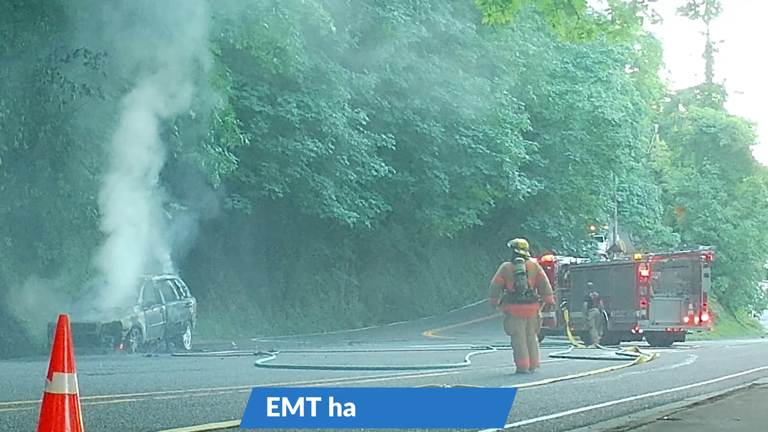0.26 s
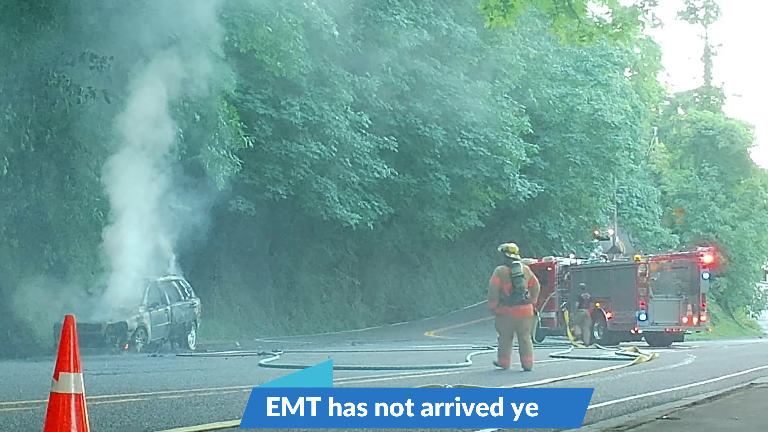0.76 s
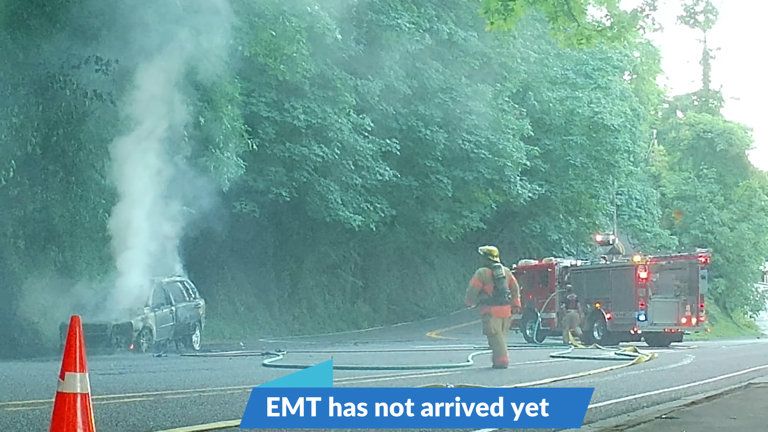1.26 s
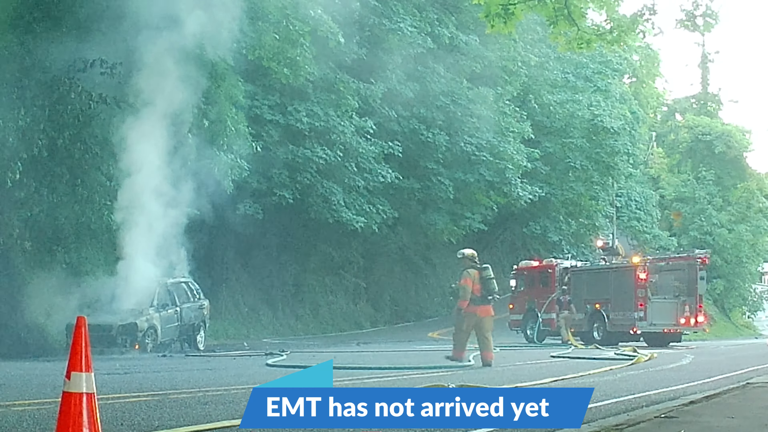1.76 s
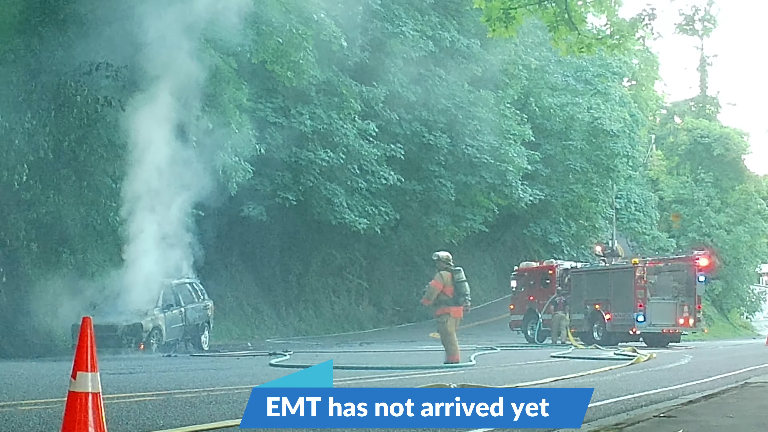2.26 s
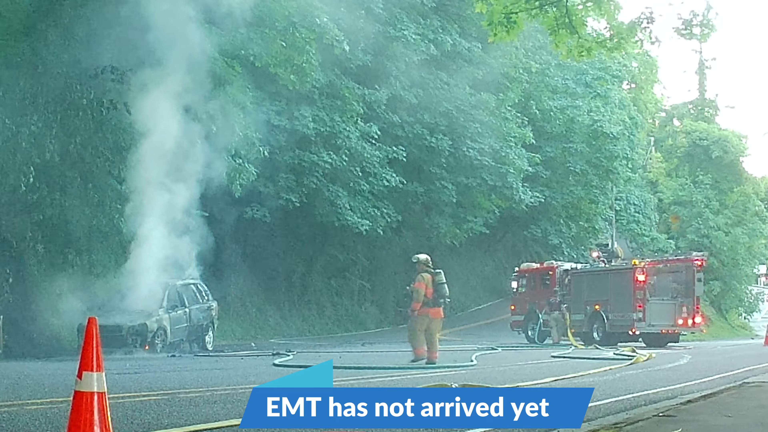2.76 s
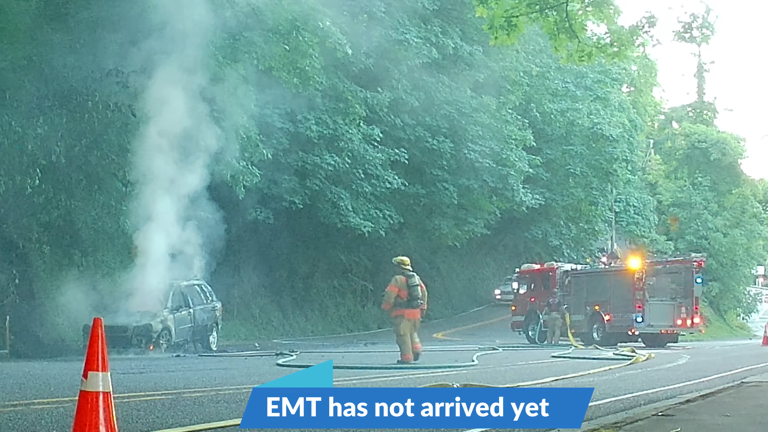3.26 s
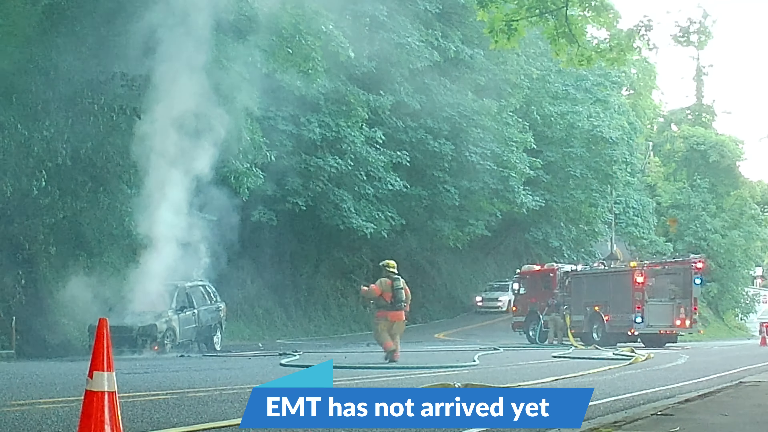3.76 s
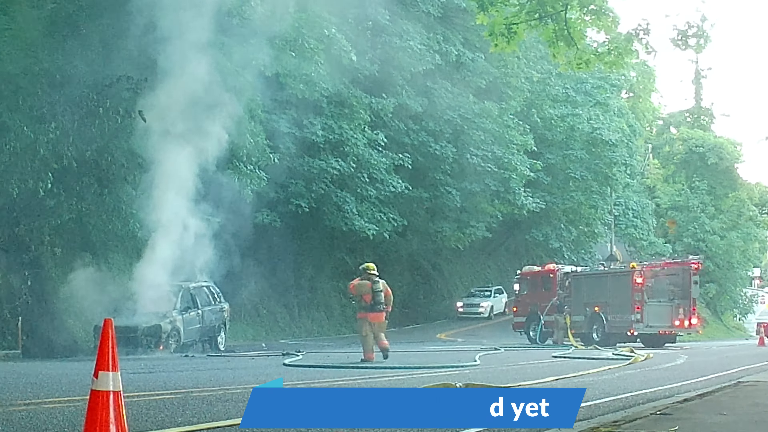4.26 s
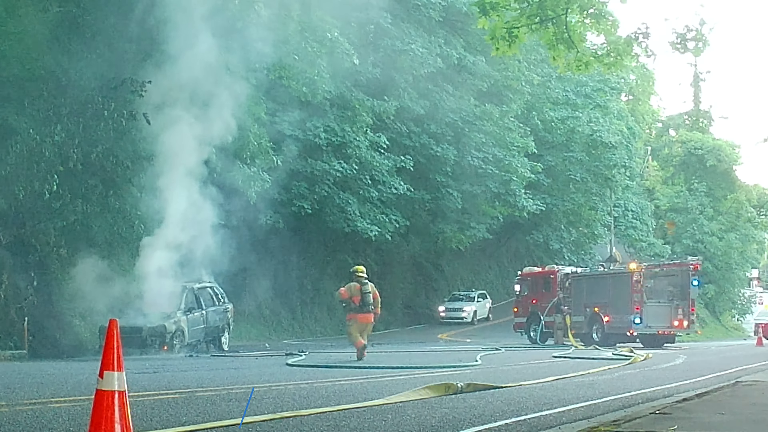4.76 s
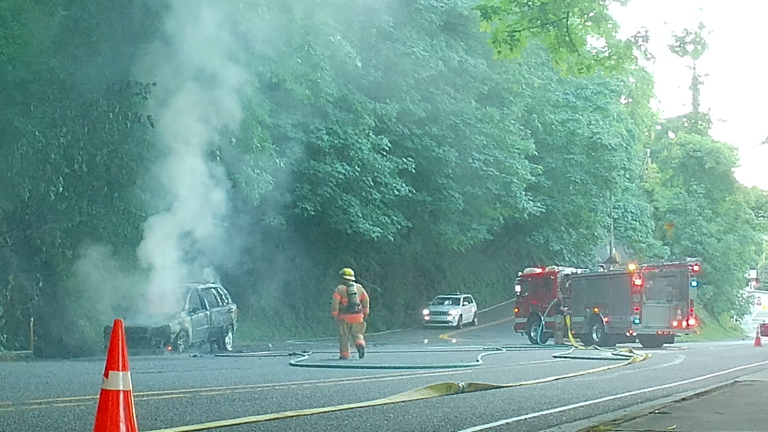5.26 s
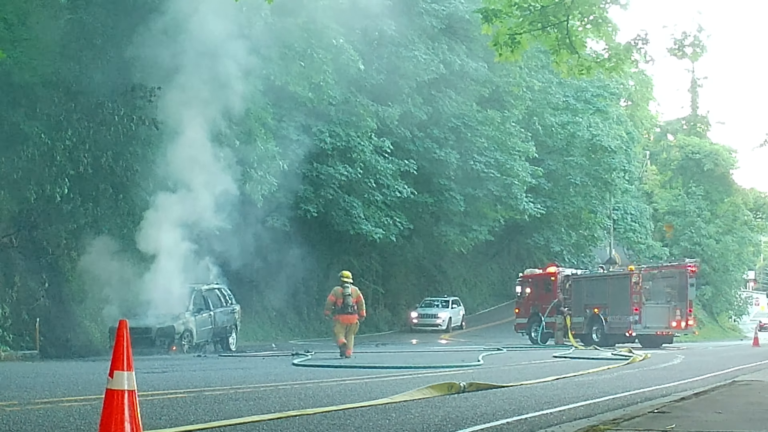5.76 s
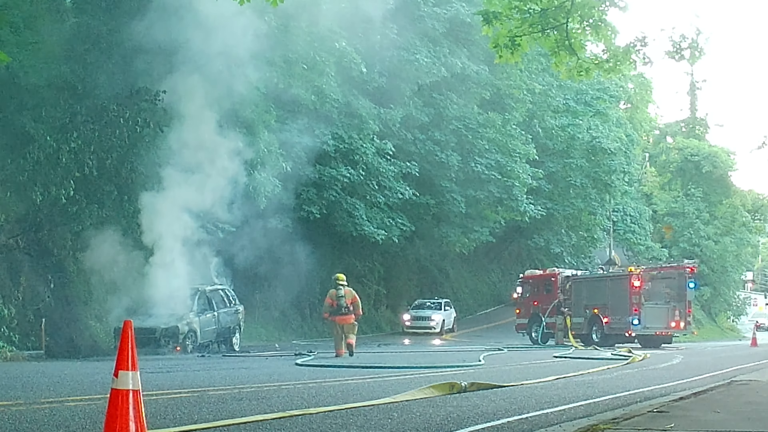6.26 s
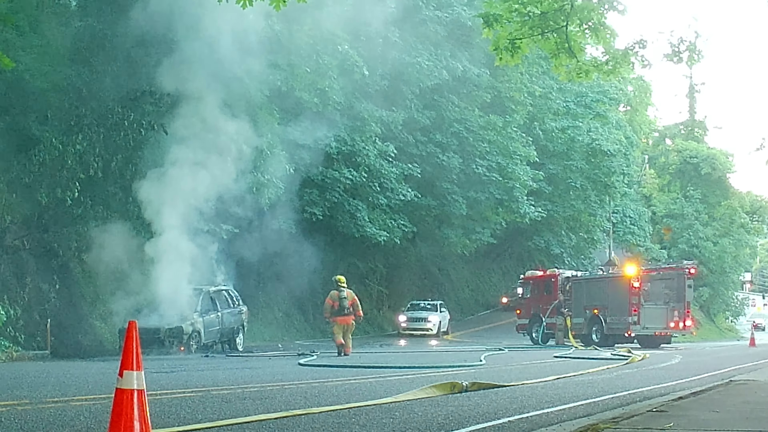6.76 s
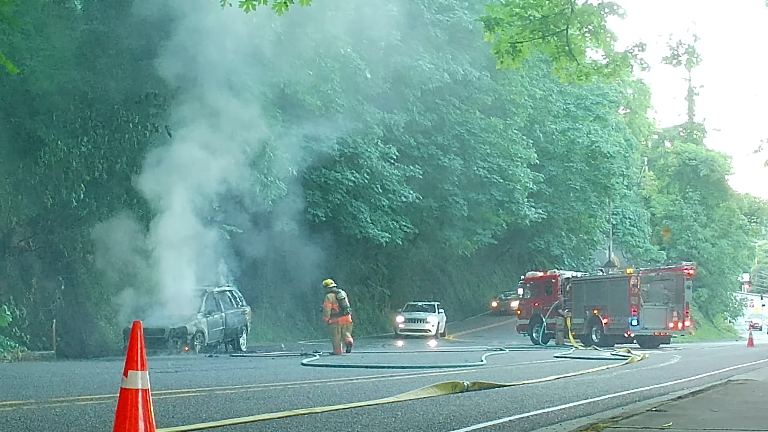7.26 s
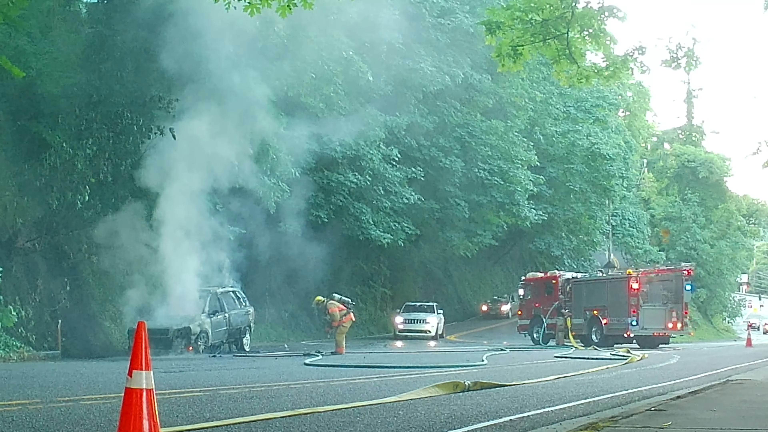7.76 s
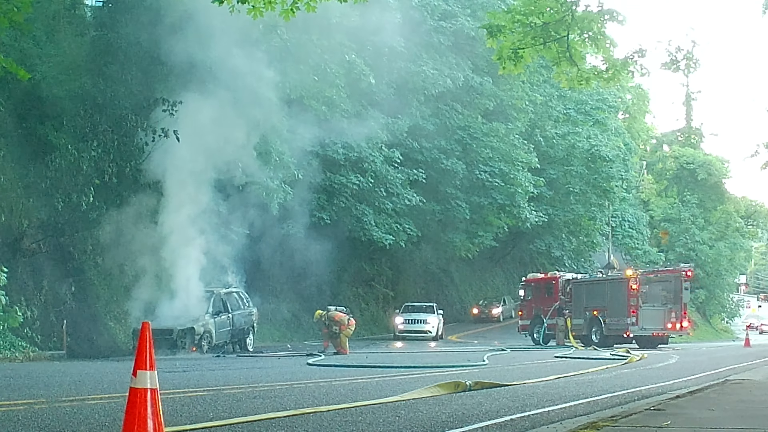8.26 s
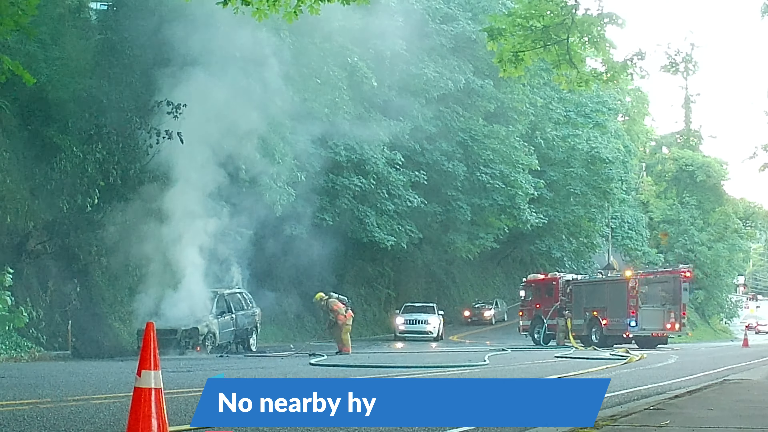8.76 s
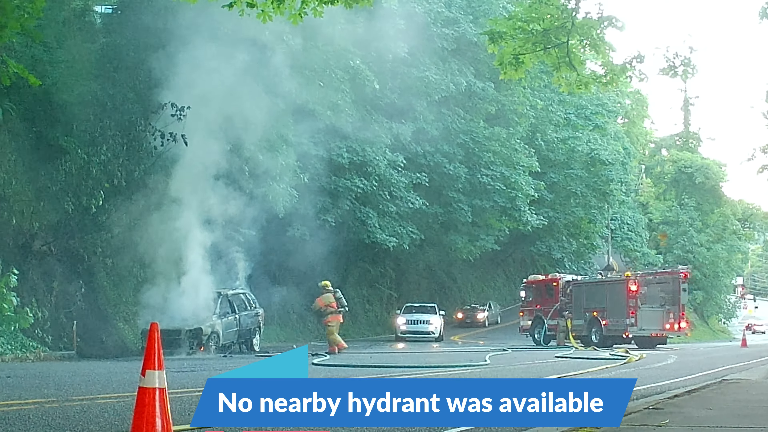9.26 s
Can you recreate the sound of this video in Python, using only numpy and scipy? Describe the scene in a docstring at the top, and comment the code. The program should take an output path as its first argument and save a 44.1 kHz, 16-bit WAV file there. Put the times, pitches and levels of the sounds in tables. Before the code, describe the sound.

Outdoors on a damp roadside, a fire engine's diesel holds a fast idle, a deep steady drone with soft muffled knocking and faint pump whine. A heavy vehicle's exhaust surges early, sinks in pitch as it slows, and fades around six seconds. Traffic rumble and wet hiss continue while queueing cars growl closer. Mono microphone at some distance, bass-heavy with faint hiss.

```python
"""Fire engine pumping on a wet road

A six-cylinder diesel at a fast idle gives steady tones locked to its crankshaft, and knocks that ring its block.
A heavy vehicle slows down nearby: three multiples of a sinking firing rate, coloured by its exhaust pipe.
Traffic rumbles, roars and hisses as coloured noise, and a queue of cars growls louder as it comes closer.
A howl wanders in pitch as one sine, and short drones and squeals swell and go as gliding tones."""
import sys
import numpy as np
from scipy import signal
from scipy.fft import irfft, next_fast_len
from scipy.io import wavfile
from scipy.ndimage import uniform_filter1d

SR = 44100
rng = np.random.default_rng(int(sys.argv[2]) if len(sys.argv) > 2 else 0)


def inscribe(sig):
    """Save sig as 16-bit PCM at rate SR to the path in sys.argv[1].

    A 1-D sig is mono; a 2-D sig holds one channel per row.
    Samples are clipped to [-1, 1] before scaling.
    """
    pcm = np.round(np.clip(np.atleast_2d(sig).T, -1, 1) * 32767)
    wavfile.write(sys.argv[1], SR, pcm.astype(np.int16))


def voltage_ratio(level):
    """Linear amplitude factor for a level in decibels (scalar or array-like)."""
    return 10 ** (np.asarray(level, float) / 20)


N = 419832
TIME = np.arange(N) / SR  # seconds

# Diesel four-stroke cycle (two crank turns), hunting slightly under the governor: (time [s], rate [cycles/s])
CYCLE_RATE = [(0, 10.51), (1.5, 10.492), (3.75, 10.533), (5.25, 10.518), (6.75, 10.534), (8.25, 10.543),
              (9.52, 10.6)]
# Steady diesel tones; 6 is the firing rate, the high ones are gear teeth and pump vanes:
# (multiple of the cycle rate [1], level [dB rms])
DIESEL_TONES = [(6, -26.5), (12, -33.5), (16, -43.5), (18, -38), (21, -46.5), (30, -46.5), (32, -44),
                (36, -47), (50, -53), (54, -53), (80, -52), (84, -59), (88, -60), (90, -53), (96, -54),
                (99, -57), (101, -59), (104, -57), (106, -57.5), (108, -57), (114, -60), (118, -53),
                (152, -56.5), (155, -67), (171, -68.5), (192, -71), (223, -73)]
# Resonances of engine block and casings: (frequency [Hz], width [Hz], level [dB rms])
BLOCK_RESONANCES = [(1060, 380, -52), (1760, 350, -71)]

# Firing rate of the slowing vehicle: (time [s], frequency [Hz])
SLOWING_FIRING = [(0, 47.8), (.85, 47.1), (2.6, 46.4), (3.4, 43.3), (4.4, 40), (4.98, 36.4), (5.25, 35.9),
                  (5.55, 34.8), (6.0, 35.7)]
# Its exhaust pipe favours some pitches, most near 73 and 130 Hz.
# Level of a multiple that falls there, before the load acts: (frequency [Hz], level [dB rms])
EXHAUST_PIPE = [(34.8, -23), (36, -32), (41, -31), (45, -24.5), (47, -22), (70, -33), (71.8, -27),
                (72.8, -17.5), (75, -29), (81, -25), (87, -31), (94, -28), (110, -48), (120, -28),
                (130, -17), (135, -22.5), (139, -29.5), (142, -33)]
# Its engine load, which jumps once and ends as it pulls up: (time [s], gain [dB])
ENGINE_LOAD = [(0, -9), (.6, -5), (.85, 5), (1.2, 3), (2.1, 1), (2.6, 0), (6.0, 0), (6.5, -40)]
# How far the 1st, 2nd and 3rd multiple follow the load: one share each [dB per dB]
LOAD_SHARES = [1, .4, .4]

# Swell of the passing traffic about its usual level: (time [s], gain [dB])
TRAFFIC_SWELL = [(0, -4), (.5, -3), (1.2, -0.5), (1.6, 1.5), (2.5, -2.5), (3.2, -0.2), (4.1, .5),
                 (5.1, -0.3), (7.2, 0.76), (8.2, 1.6), (9.52, -.3)]
# Level of the ground rumble: (time [s], level [dB rms])
RUMBLE_LOUDNESS = [(0, -22.5), (.8, -21), (3.4, -21.5), (4.2, -21), (5.8, -23.5), (7.1, -21), (7.7, -22.5),
                   (9.52, -19)]
# Level of the wet hiss: (time [s], level [dB rms])
HISS_LOUDNESS = [(0, -54), (1.8, -52.5), (2.4, -53.3), (4.4, -52.5), (6.9, -53), (8.3, -51), (9.52, -50.5)]
# Colours of the noises, only the shape counts: (frequency [Hz], relative level per Hz [dB])
RUMBLE_COLOUR = [(5, -20), (14, -2.5), (22, -1.5), (32, 3), (44, -1), (56, 0), (75, -1.5), (100, 0.5),
                 (125, -6.5), (150, -5.5), (220, -18), (290, -26)]
ROAR_COLOUR = [(100, -27.5), (170, -2), (275, -4.5), (338, -5.5), (427, -10), (492, -7.5), (609, -13.5),
               (800, -20), (1040, -31), (1760, -120)]
GROWL_COLOUR = [(150, -18), (200, -3), (250, 4.5), (300, -9.5), (350, -18)]
MOAN_COLOUR = [(440, -17), (478, -6.5), (495, -4.5), (525, -7.5), (570, -19.5)]
RUSH_COLOUR = [(380, -28), (650, -1.5), (1100, -5), (1490, -12), (1620, -12.5), (2190, -20), (3000, -27.5),
               (3900, -42), (6600, -120)]
HISS_COLOUR = [(1530, -16.5), (2600, -4), (3400, -6), (4520, -12), (5500, -13), (6600, -14.5), (8000, -19),
               (9200, -24), (10300, -21), (11500, -28.5), (13500, -43)]
MICROPHONE_COLOUR = [(5000, -9), (9000, 1.5), (12000, -2.5), (15500, -3.5), (16100, -7)]

# Pitch of the wandering howl, before its corners are smoothed: (time [s], frequency [Hz])
HOWL_PITCH = [(.4, 336), (.95, 388), (1.9, 428), (2.28, 338), (2.45, 325), (2.72, 322), (3.05, 372),
              (3.5, 371), (3.8, 381), (4.25, 382), (4.6, 334), (4.8, 349), (5.02, 349), (5.25, 326),
              (5.55, 352), (5.8, 326), (6.1, 341), (7.7, 357), (8.3, 360), (8.8, 310)]
# Level of the howl; it drops out once and flares before the end: (time [s], level [dB rms])
HOWL_LOUDNESS = [(.4, -55), (.52, -36), (1.03, -35), (1.2, -52), (1.9, -52), (2.02, -36), (4.4, -31),
                 (6.0, -33.5), (8.25, -32.5), (8.5, -27), (8.68, -33), (8.8, -55)]
# Drones and squeals that swell and go, with the level at the middle of each:
# (middle [s], length [s], start frequency [Hz], end frequency [Hz], level [dB rms])
DRONES_AND_SQUEALS = [(1.55, .9, 495, 486, -36), (2.05, 1.1, 8500, 7900, -73), (4.5, .8, 20.5, 19.5, -25),
                      (5.25, .5, 129, 126, -30), (5.4, .9, 8150, 8400, -75.5), (6.5, .5, 87, 84, -30),
                      (6.95, .5, 115, 118, -25), (7.25, .4, 128, 126, -22), (7.5, .4, 103, 99, -30),
                      (8.05, .5, 249, 251, -33), (8.3, .7, 96, 105, -20), (8.95, .8, 74, 73, -24),
                      (9.02, .22, 12040, 12060, -77), (9.45, .5, 127, 128, -23)]


def rms_one(x):
    """Scale to rms 1."""
    return x / np.sqrt(np.mean(x ** 2))


def in_time(rows):
    """Join the points of a (time, value) table by straight lines."""
    times, values = np.transpose(rows)
    return np.interp(TIME, times, values)


def drift(rate_hz, spread_db, size=N):
    """A slowly wandering gain: white noise twice through a one-pole low-pass, read as dB."""
    # one slow value per 100 samples; the first 2000 let the filter settle
    pole = np.exp(-200 * np.pi * rate_hz / SR)
    white = rng.standard_normal(N // 100 + 2002)
    slow = signal.lfilter([1], [1, -2 * pole, pole * pole], white)[2000:]
    gain = voltage_ratio(spread_db * rms_one(slow))
    return np.interp(np.arange(size) / 100, np.arange(len(slow)), gain)


def tone(hz, waver_db, waver_hz):
    """A sine of rms about 1 whose strength wavers on its way through moving air."""
    angle = np.cumsum(hz * (2 * np.pi / SR)) + 2 * np.pi * rng.random()
    return np.sqrt(2) * drift(waver_hz, waver_db, size=len(hz)) * np.sin(angle)


def noise(colour, level_db, patchy_db):
    """Random noise shaped to a colour, at a given level, whose strength wanders by patchy_db."""
    hz, db = np.transpose(colour)
    size = next_fast_len(N)
    bins_hz = np.fft.rfftfreq(size, 1 / SR) + 1e-3  # the offset avoids log(0)
    # straight lines over log frequency, practically silent outside the table
    shape = voltage_ratio(np.interp(np.log(bins_hz), np.log(hz), db, left=-200, right=-200))
    chance = rng.standard_normal(2 * len(shape)).view(complex)
    coloured = rms_one(irfft(shape * chance, size)[:N])
    return voltage_ratio(level_db) * drift(8.0, patchy_db) * coloured


def diesel():
    """Tones locked to one crankshaft; valves and injectors knock on the block in a pattern kept every cycle."""
    cycle_hz = in_time(CYCLE_RATE)
    out = np.zeros(N)
    for multiple, db in DIESEL_TONES:
        out += voltage_ratio(db) * tone(multiple * cycle_hz, waver_db=1.2, waver_hz=1.2)

    cycles_done = np.cumsum(cycle_hz) / SR
    knocks = np.zeros(N)
    for place, strength in rng.random((24, 2)):  # 24 knocks, each at its own place in the cycle
        at = np.searchsorted(cycles_done, np.arange(place, cycles_done[-1]))
        knocks[at] += (strength - .5) * voltage_ratio(rng.normal(0, 1.4, len(at)))
    low_pass = signal.butter(4, 2200, fs=SR, output="sos")
    soft_knocks = signal.sosfilt(low_pass, knocks + 1e-18)
    for hz, width_hz, db in BLOCK_RESONANCES:
        b, a = signal.iirpeak(hz, hz / width_hz, SR)
        out += voltage_ratio(db) * rms_one(signal.lfilter(b, a, soft_knocks))
    return out


def slowing_vehicle():
    """Three multiples of a firing rate that sinks as the vehicle brakes, each coloured by the pipe at its pitch."""
    firing_hz, load_db = in_time(SLOWING_FIRING), in_time(ENGINE_LOAD)
    pipe_hz, pipe_db = np.transpose(EXHAUST_PIPE)
    out = np.zeros(N)
    for multiple, share in enumerate(LOAD_SHARES, start=1):
        hz = multiple * firing_hz
        level_db = share * load_db + np.interp(hz, pipe_hz, pipe_db)
        out += voltage_ratio(level_db) * tone(hz, waver_db=.8, waver_hz=3.0)
    return out


def queue_growl():
    """Cars creep up to the closed lane and stop; their growl grows as one over the distance."""
    start_m, rest_m, stops_s = 92, 13.7, 6.94
    distance_m = np.interp(TIME, [0, stops_s], [start_m, rest_m])
    return rest_m / distance_m * noise(GROWL_COLOUR, -31.5, 0.31)  # -31.5 dB rms at rest


def traffic():
    """Roar, rush and moan ride on one swell; rumble and wet hiss have their own levels, and the queue growls."""
    swell_db = in_time(TRAFFIC_SWELL)
    # usual level [dB rms] plus a share of the swell
    roar = noise(ROAR_COLOUR, -27.5 + 1.14 * swell_db, 0.15)
    rush = noise(RUSH_COLOUR, -35 + 0.91 * swell_db, 0.11)
    moan = noise(MOAN_COLOUR, -42 + 2.4 * swell_db, 0.3)
    rumble = noise(RUMBLE_COLOUR, in_time(RUMBLE_LOUDNESS), 0.68)
    hiss = noise(HISS_COLOUR, in_time(HISS_LOUDNESS), 0.15)
    return rumble + roar + queue_growl() + moan + rush + hiss


def microphone_hiss():
    """The microphone's own steady noise."""
    return noise(MICROPHONE_COLOUR, -65.0, 0)


def howl():
    """One nearly clean line that turns its corners with some inertia."""
    inertia_s = .08
    hz = uniform_filter1d(in_time(HOWL_PITCH), int(inertia_s * SR))
    unsteady_hz = hz * drift(6.0, .03)
    return voltage_ratio(in_time(HOWL_LOUDNESS)) * tone(unsteady_hz, waver_db=2.5, waver_hz=9.0)


def swells():
    """Each is a gliding, slightly unsteady tone under a smooth rise and fall."""
    out = np.zeros(N)
    for middle_s, length_s, start_hz, end_hz, db in DRONES_AND_SQUEALS:
        sounding = abs(TIME - middle_s) < length_s / 2
        along = (TIME[sounding] - middle_s) / length_s + .5  # 0 at the start, 1 at the end
        hz = start_hz + (end_hz - start_hz) * along
        unsteady_hz = hz * drift(40.0, .12, size=len(along))
        rise_and_fall = 4 * along * (1 - along)
        out[sounding] += voltage_ratio(db) * rise_and_fall * tone(unsteady_hz, waver_db=1.5, waver_hz=8.0)
    return out


def scene():
    """All sources add up in one channel."""
    return (diesel() + slowing_vehicle() + traffic() + howl() + swells())[None]


def roll_off(x):
    """The treble ends steeply here."""
    return signal.sosfilt(signal.butter(12, 16130, fs=SR, output="sos"), x)


def record(dry):
    """The microphone adds its steady hiss, peaks are gently rounded and the last 4 ms fade out."""
    ceiling = 1.1
    fade = np.clip((N - np.arange(N)) / (.004 * SR), 0, 1)
    sound = dry + microphone_hiss()
    rounded = ceiling * np.tanh(sound / ceiling)
    return roll_off(fade * rounded)


dry = scene()
out = record(dry)
inscribe(out)
```